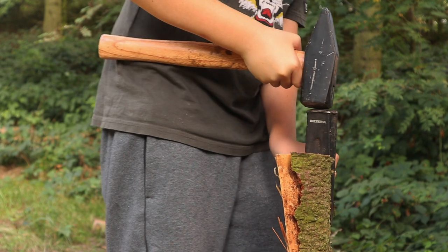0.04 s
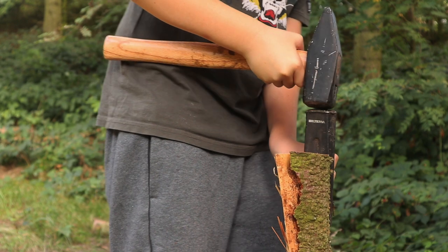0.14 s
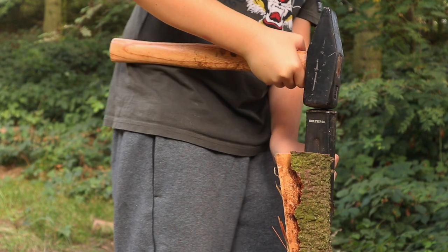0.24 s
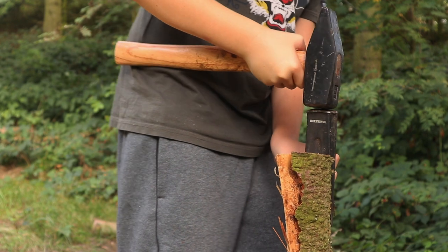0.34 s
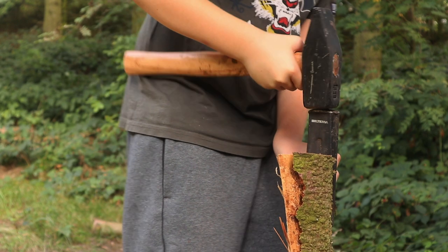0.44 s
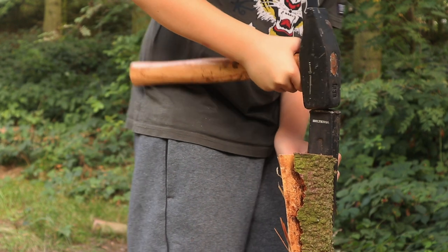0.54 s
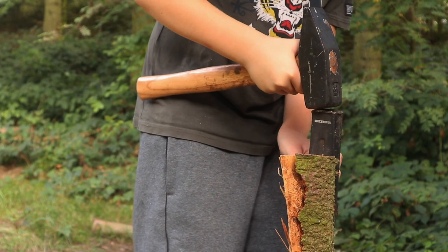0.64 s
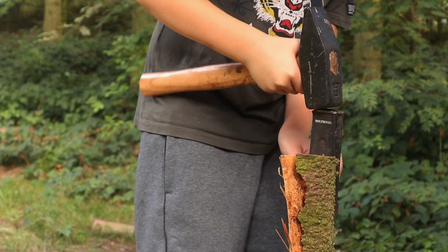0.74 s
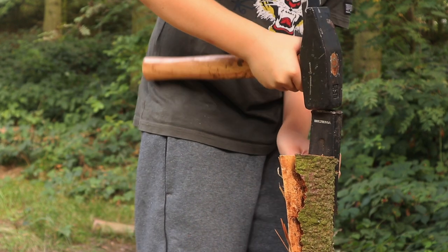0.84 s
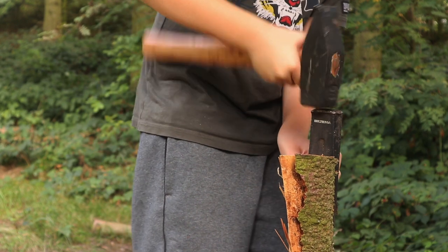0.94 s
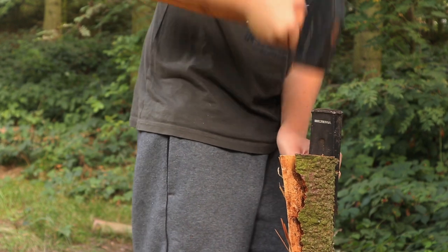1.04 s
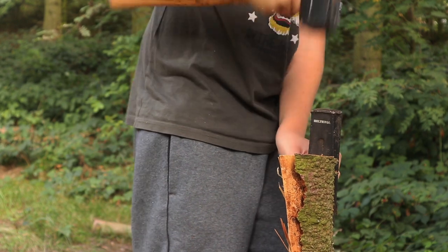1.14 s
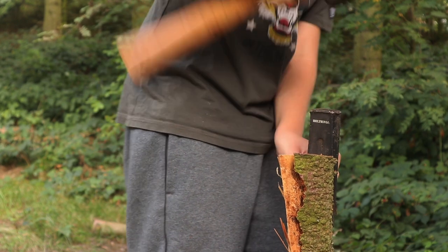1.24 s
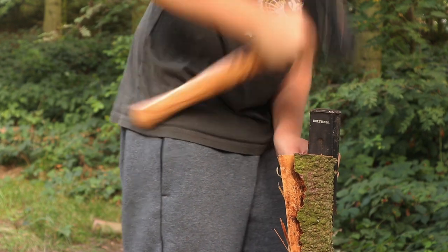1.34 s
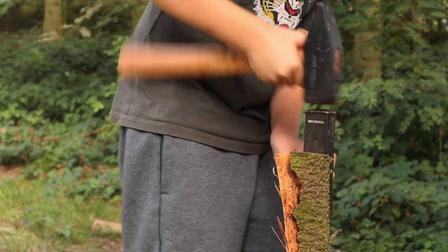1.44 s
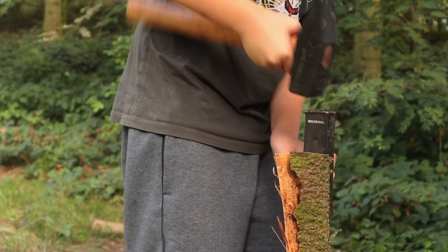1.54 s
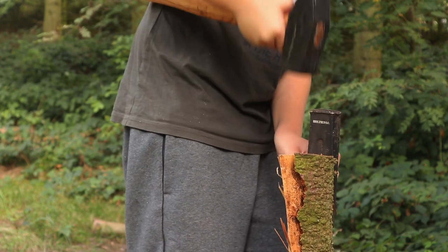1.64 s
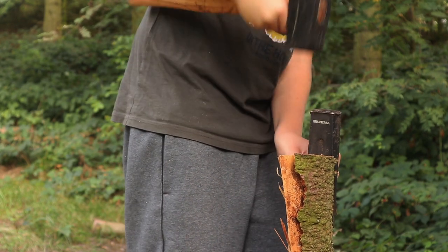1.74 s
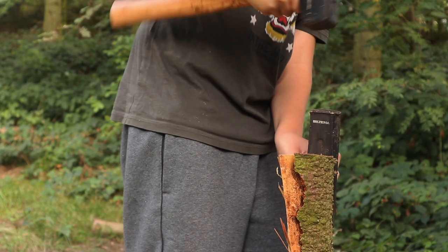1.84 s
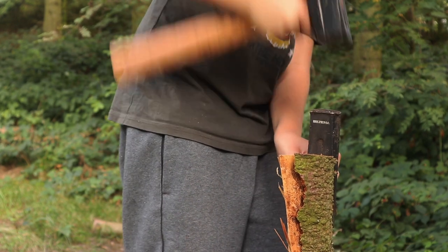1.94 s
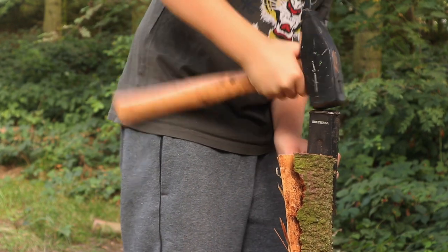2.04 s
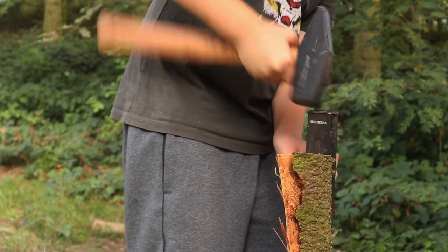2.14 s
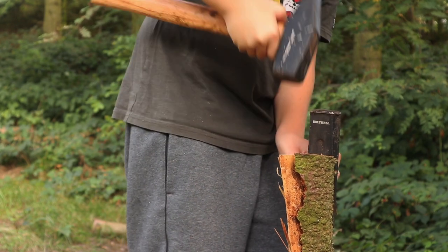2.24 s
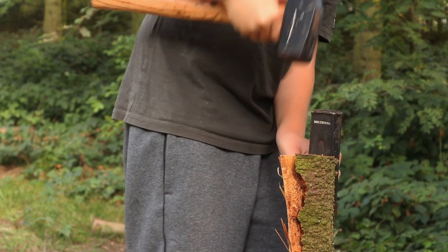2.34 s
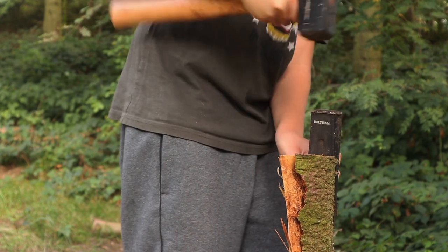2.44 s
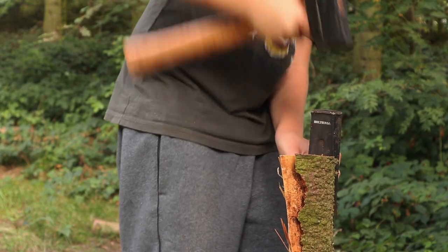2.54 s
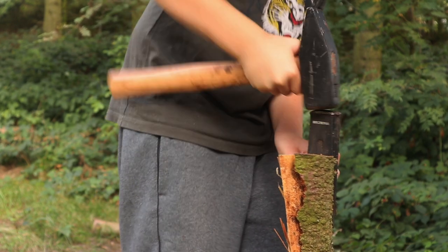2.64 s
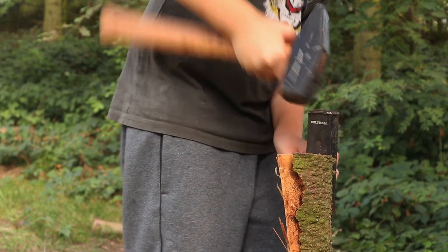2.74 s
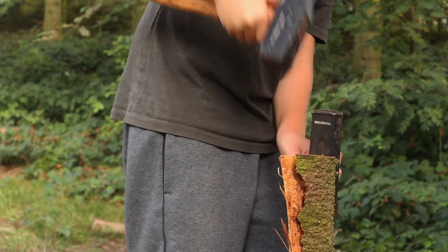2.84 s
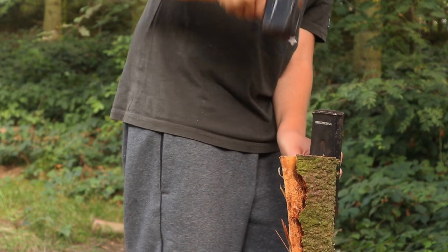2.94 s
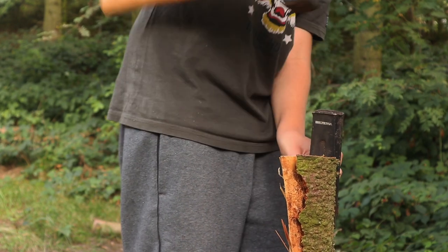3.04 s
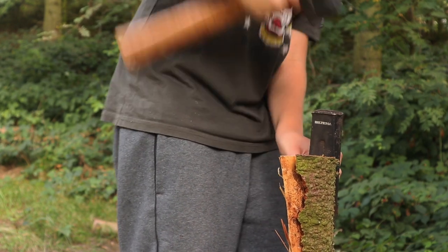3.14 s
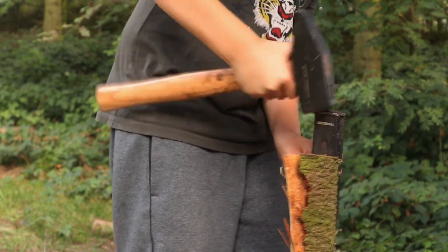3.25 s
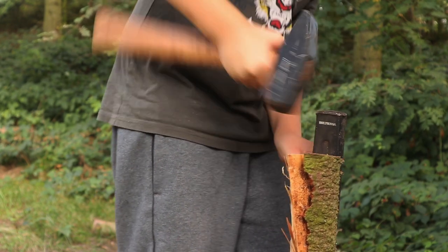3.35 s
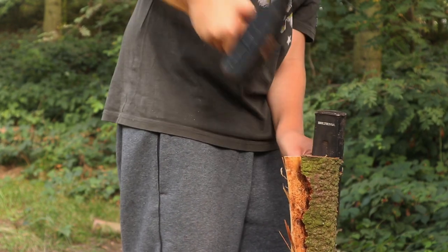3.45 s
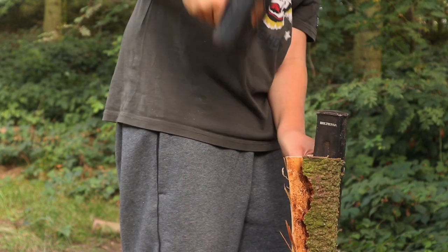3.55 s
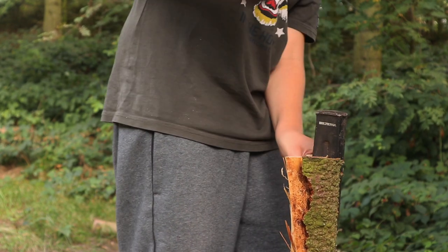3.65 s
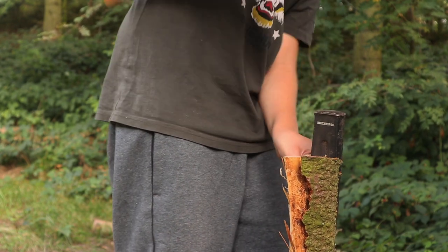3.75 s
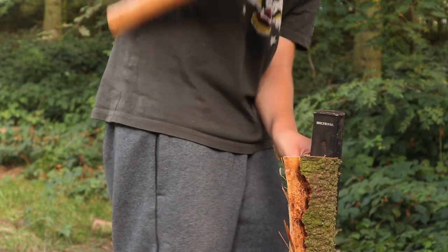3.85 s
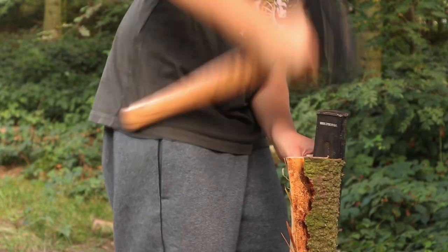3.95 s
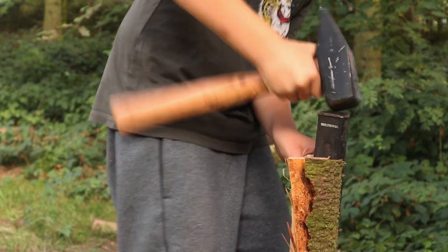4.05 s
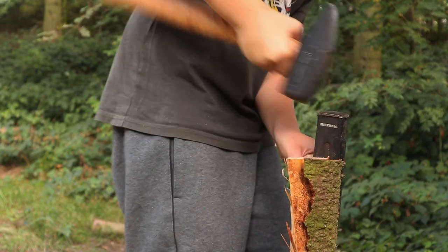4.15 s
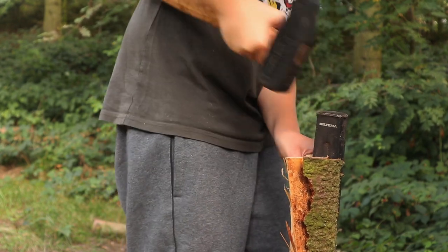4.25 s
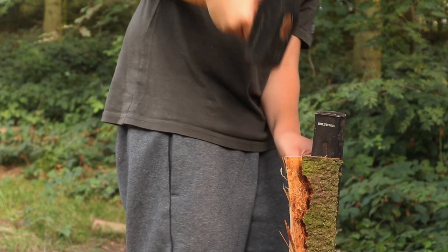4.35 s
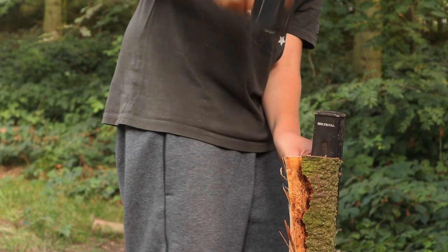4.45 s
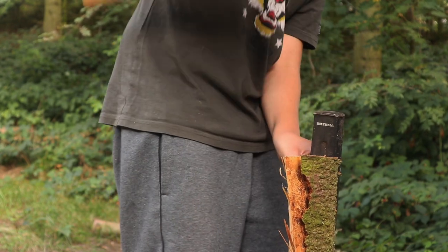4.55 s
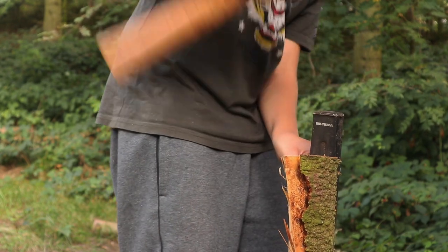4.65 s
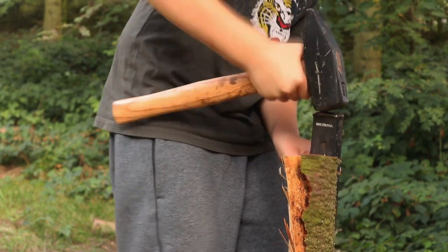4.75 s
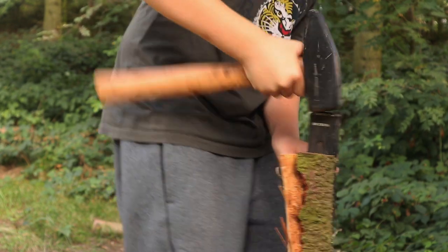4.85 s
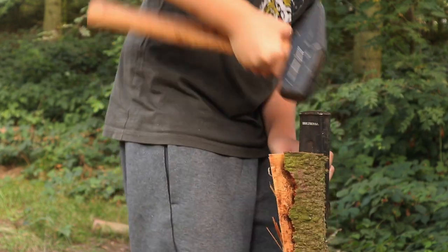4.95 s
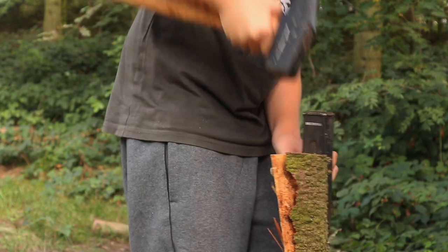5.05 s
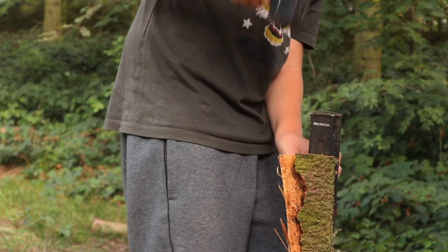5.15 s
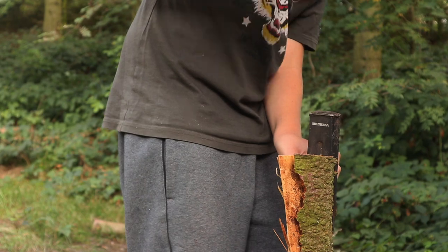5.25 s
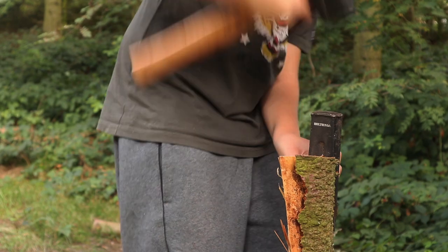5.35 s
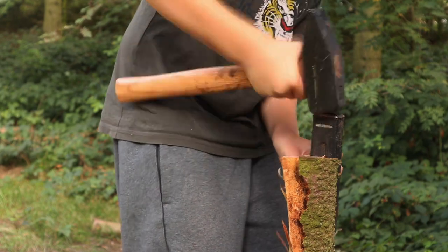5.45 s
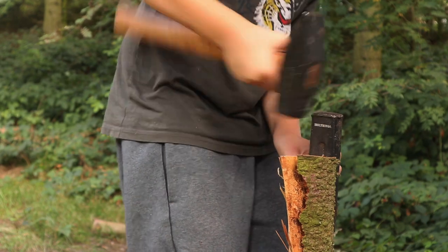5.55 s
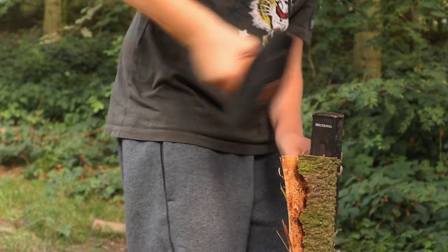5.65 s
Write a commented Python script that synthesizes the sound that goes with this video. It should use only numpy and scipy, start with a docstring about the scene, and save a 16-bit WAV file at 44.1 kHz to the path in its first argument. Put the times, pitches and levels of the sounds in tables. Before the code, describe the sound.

A hammer strikes a steel wedge in a log seven times, sharp metal blows echoing through a forest with faint birdsong.

```python
"""A hammer drives a steel wedge into an upright log: seven close blows in a forest clearing.
Log and steel ring briefly, the wood cracks, the soil shudders, and after two blows the hammer bounces.
The trees send each blow back. Sleeves rustle, and small birds whistle over soft air and a far, low drone.
The blows overload the microphone; its gain control turns down at each one and creeps back up."""
import sys
import numpy as np
from scipy import signal
from scipy.fft import rfft, irfft
from scipy.io import wavfile
from scipy.ndimage import uniform_filter1d

SR = 44100
rng = np.random.default_rng(int(sys.argv[2]) if len(sys.argv) > 2 else 0)


def store_pcm(level_fs):
    """Save levels as 16-bit WAV."""
    pcm = np.round(np.clip(level_fs, -1, 1) * 32767).astype(np.int16)
    wavfile.write(sys.argv[1], SR, np.atleast_2d(pcm).T)


N = 250915

# One row a blow: t/s, force/dB, log/dB, middle/dB, treble/dB, log's pitch factor, second contact/ms,
# outer steel tones/dB, inner steel tones/dB, after-ring/dB, soil/dB
BLOWS = [(1.3527, -0.5, .5, -6, 2, 0.97, 2.2, -34, -39, 3, 1),
         (1.9888, 1, -4.5, -3, -2.5, 1.023, 2.46, -43, -40.5, 13.5, -7),
         (2.5980, 2, -7.5, -4, 2.5, 0.92, 1.9, -43.5, -48, 3, -7),
         (3.2103, 0, -5.5, -5, 4.5, 1.05, 1.8, -40.5, -37, 3, 3.5),
         (3.9790, 0.5, -1, 0, -0.5, .99, 1.8, -46, -23, 8.5, 3),
         (4.7491, 1, -1.5, -0.5, -0.5, 1.025, 1.56, -56, -30, 1, 2.5),
         (5.4299, 4.5, -7, -2.5, 3.5, 0.98, 2.3, -31, -23, 1.5, 2.5)]
def hammer(trunk_s=0.039, trunk_db=-32, ring_echo_db=-20, echo_db=2.04):
    """The hammer hits and bounces close by, and the trees answer."""
    close, echoes = np.zeros((2, 2, N))
    for s, force_db, *stroke, _ in BLOWS:
        sound = blow(force_db, *stroke)
        add(close, s, sound)
        add(echoes, s + trunk_s, amp(trunk_db) * sound)  # one distinct trunk echo, just after the blow
        add(echoes, s, amp(force_db + echo_db) * crack_echo())
    close += bounces()
    return microphone_pair(close) + echoes + amp(ring_echo_db) * scatter(close.mean(0))


# Tones of the log (first four), then of hammer and wedge pressed together: f/Hz; level/dB
BODY_HZ = [165, 320, 590, 805, 1260, 1500, 1815, 2220, 2675, 3090, 3520, 3835, 4500, 5850, 6940, 9670]
BODY_DB = [-17.5, -19, -12, -8.5, -14, -9.5, -7, -4.5, -2, -10.5, -9, -5.5, -12, -13.5, -12.5, -18]
# How long they take to fade by 60 dB: f/Hz, fade/s
BODY_FADE = [(150, 0.045), (550, 0.031), (800, .046), (1250, 0.028), (1850, 0.022), (3000, 0.017),
             (10000, 0.009)]
# Log and hammer head sing on faintly once they part: f/Hz, level/dB, fade/s
AFTER_RING = [(550, -42.5, 0.052), (793.7, -34, 0.076), (1780, -34.5, 0.11), (2586, -41, 0.15),
              (3980, -45.5, 0.068)]
# Steel ringing freely: f/Hz, level/dB, fade/s
STEEL_TONES = [(8484, .5, .13), (9103, 1, .125), (12330, -14, .09), (15200, -21, .11)]
# How alike the crack is left and right: f/Hz, likeness (1 same, 0 unrelated, -1 opposite)
CRACK_LIKENESS = [(1000, 1), (3500, .9), (9000, .5)]
def blow(force_db, log_db, middle_db, treble_db, pitch, again_ms, outer_db, inner_db, after_db,
         again_gain=0.11, crack_db=-12, crack_fade_s=0.051, rise_s=.0003):
    """Steel meets steel twice within a few ms; the wedge jerks forward and the wood fibres crack."""
    t = np.arange(SR // 4) / SR
    balance = [(700, log_db), (1400, middle_db), (2700, middle_db), (3800, treble_db)]
    hz = np.array(BODY_HZ, float)
    hz[:4] *= pitch  # the log's pitch shifts as it splits
    tones = list(zip(hz, BODY_DB + read(balance, hz), read(BODY_FADE, hz)))
    body = (ring(tones, t) + again_gain * ring(tones, t - again_ms / 1000)).sum(0)
    body += amp(after_db) * ring(AFTER_RING, t).sum(0)
    spectrum = [(100, -14), (600, 0.5), (3000, 5.5), (6000, -7.5), (10000, -13.5), (16000, -24.5)]
    fibres = unit_level(colour(stereo_noise(len(t), CRACK_LIKENESS), spectrum))
    crack = fibres * amp(crack_db + treble_db - 60 * t / crack_fade_s)
    steel = amp([outer_db, inner_db, inner_db, outer_db]) @ ring(STEEL_TONES, t)  # set by the spot hit
    return amp(force_db) * (body + crack + steel) * (1 - np.exp(-t / rise_s))


# The hammer's bounces: t/s, level/dB
BOUNCES = [(3.2192, -10), (3.2440, -12.5), (5.4400, -2.5), (5.465, -11), (5.5085, -12)]
# The log's dull knock and the lightly tapped wedge: f/Hz, level/dB, fade/s
LOG_KNOCK = [(150.2, -28, .07), (252, -23.5, 0.054)]
WEDGE_TONES = [(780, -19.5, .03), (1350, -7, .015), (1927, 3, 0.025), (2665, -5, 0.022), (3970, -23, 0.027)]
def bounces(rise_s=0.00035):
    """The hammer falls back on the wedge and taps it."""
    out, t = np.zeros(N), np.arange(SR // 10) / SR
    tap = ring(LOG_KNOCK + WEDGE_TONES, t).sum(0) * (1 - np.exp(-t / rise_s))
    for s, db in BOUNCES:
        add(out, s, amp(db) * tap)
    return out


# The shudder in the soil: f/Hz, level/dB
SOIL_SPECTRUM = [(20, -11.5), (70, -5), (125, 0.5), (210, -3.5), (320, -8.5), (500, -24.5), (1000, -71.5)]
def ground(rise_s=.012, fade_s=0.2, shudder_db=-35, sway_hz=45, sway_db=-42, sway_s=0.035):
    """The log passes each blow into the soil, which shudders at once and sways a little later."""
    out, t = np.zeros(N), np.arange(SR // 2) / SR
    sway = amp(sway_db) * np.sin(2 * np.pi * sway_hz * t) * (t / sway_s * np.exp(1 - t / sway_s)) ** 2
    envelope = (1 - np.exp(-t / rise_s)) * amp(shudder_db - 60 * t / fade_s)
    for s, force_db, *_, soil_db in BLOWS:
        shudder = unit_level(colour(rng.standard_normal(len(t)), SOIL_SPECTRUM)) * envelope
        add(out, s, amp(force_db + soil_db) * (shudder + sway))
    return out


# A blow as the trees send it back: f/Hz, level/dB
ECHO_SPECTRUM = [(100, -1.5), (330, -6), (560, 1.5), (800, 3.5), (1100, -4.5), (1500, 1), (1900, 3.5),
                 (2550, 1), (3200, -2.5), (3850, -2), (5200, -7), (9300, -10), (11000, -25.5),
                 (16000, -38.5)]
def crack_echo():
    """The crack comes back from all around."""
    return colour(forest(), ECHO_SPECTRUM)


# How long echoes last: f/Hz, fade/s
ECHO_FADE = [(100, 0.18), (500, 0.28), (2000, 0.42), (4000, 0.41), (8000, .4), (14000, 0.65)]
# How alike they are left and right: f/Hz, likeness
ECHO_LIKENESS = [(200, 1), (800, .96), (2000, .84), (3200, .5), (5000, 0), (9000, -.3)]
def forest(build_s=0.006, near_db=2, near_s=0.028, uneven=.18):
    """Echoes of one click from trunks and leaves; the nearest are the strongest."""
    echoes = stereo_noise(SR) * (1 + uneven * wobble(SR, 200))
    hz, t, bands = signal.stft(echoes, SR, nperseg=256)
    bands = bands * amp(-60 * t / read(ECHO_FADE, hz)[:, None])
    tail = signal.istft(bands, SR, nperseg=256)[1][:, :SR]
    t = np.arange(SR) / SR
    return tail / np.linalg.norm(tail[0]) * (1 - np.exp(-t / build_s)) * amp(near_db * np.exp(-t / near_s))


def scatter(x):
    """What the forest sends back of a sound."""
    return signal.fftconvolve(x[None], forest(), axes=1)[:, :N]


# How far the left side is ahead: f/Hz, phase/rad
LEFT_LEAD = [(100, 0), (2500, -0.34), (4000, 0.39), (5500, -1.2), (8000, -1.4), (11000, -1.1),
             (16000, -0.68)]
def microphone_pair(x, right_db=1.63):
    """A near sound reaches the two microphone openings slightly out of step."""
    shift = np.exp(.5j * read(LEFT_LEAD, frequencies(x)))
    return irfft(rfft(x) * np.array([shift, amp(right_db) / shift]), N)


def swings(swing_s=0.2, swing_db=-66):
    """The sleeve rustles ever louder as the arm comes down for each blow."""
    out, speed = np.zeros((2, N)), np.linspace(0, 1, round(swing_s * SR))
    spectrum = [(150, 4), (1000, -8), (4000, -11), (12000, -30)]
    for s, *_ in BLOWS:
        rustle = unit_level(colour(stereo_noise(SR // 2), spectrum))
        add(out, s - swing_s, amp(swing_db) * speed * rustle[:, :len(speed)])
    return out


# Faint swells of noise: t/s, length/s, strongest f/Hz, level/dB
RUSTLES = [(0.634, 0.0087, 5000, -62), (1.45, 0.61, 2241, -67.5), (2.271, 0.04, 905, -58.5)]
def rustles():
    """Two brief soft brushes and a longer, faint, distant rustle."""
    out = np.zeros((2, N))
    for s, length, hz, db in RUSTLES:
        noise = unit_level(colour(stereo_noise(SR), [(hz / 8, -6), (hz, 0), (hz * 2, -9), (hz * 4, -26)]))
        swell = np.hanning(round(length * SR))
        add(out, s, amp(db) * noise[:, :len(swell)] * swell)
    return out


# Raspy calls: t/s, level/dB
RASPY_CALLS = [(4.721, -54), (4.922, -47.5), (5.256, -48.5)]
# Note shapes: start f/Hz, turn f/Hz, end f/Hz, place of the turn (0-1), rasp (share of the pitch)
RISE = (4650, 5850, 7900, .45, .06)
FALL = (4750, 3600, 2950, .48, .045)
def raspy_bird(rise_s=0.033, rise_db=-12, fall_after_s=0.02, fall_s=.066, echo_db=-1.5):
    """Each call is a raspy rise, then a louder fall."""
    out = np.zeros(N)
    for s, db in RASPY_CALLS:
        add(out, s, whistle(rise_s, db + rise_db, *RISE, octave_db=-19.5))
        add(out, s + fall_after_s, whistle(fall_s, db, *FALL))
    return out + amp(echo_db) * scatter(out)


# The song's opening slides: t/s, level/dB
SLIDES = [(2.16, -54.5), (2.243, -53.5)]
# Note shapes, with the same columns as RISE
SLIDE = (4300, 3700, 2950, .4, .01)
TWEET = (6200, 6150, 5400, .45, .018)
FLICK = (8600, 6500, 4600, .5, .018)
ARCH = (3150, 4150, 2100, .58, .008)
def near_bird(slide_s=.038, tweet_s=.028, flick_s=.014, arch_s=.044, step_db=-2.16, echo_db=-8):
    """One song: two downward slides, a high two-voiced twitter, then slower up-and-down notes."""
    out = np.zeros(N)
    for s, db in SLIDES:
        add(out, s, whistle(slide_s, db, *SLIDE))
    for k in range(5):  # both runs get softer note by note
        twitter_at, twitter_db = 2.351 + k * .048, -59 + k * step_db
        arch_at, arch_db = 2.853 + k * .081, -58 + k * step_db
        add(out, twitter_at, whistle(tweet_s, twitter_db, *TWEET))
        add(out, twitter_at + .013, whistle(flick_s, twitter_db - 6, *FLICK))  # the second voice
        add(out, arch_at, whistle(arch_s, arch_db, *ARCH))
    return out + amp(echo_db) * scatter(out)


# Single notes deep in the trees: t/s, length/s, level/dB, start f/Hz, turn f/Hz, end f/Hz
FAR_NOTES = [(1.24, 0.049, -74, 2980, 2710, 2400), (4.441, 0.039, -70, 3910, 4310, 4400),
             (4.612, 0.027, -69.5, 4900, 5920, 6350), (4.64, 0.053, -67.5, 4270, 4330, 5150)]
# The notes of one phrase: same columns, time and level relative to the phrase
PHRASE_NOTES = [(-.04, .05, -20, 6900, 6750, 6300), (.002, .06, -.5, 4900, 5750, 5520),
                (-.002, .068, -1, 4100, 5300, 4000), (.07, .066, -.5, 4000, 5450, 4350),
                (.085, .05, -10, 3100, 4050, 5100), (.135, .045, -14, 7700, 8500, 8300),
                (.148, .035, -6, 3150, 3480, 4200)]
# Each time it is sung: t/s, level/dB
PHRASES = [(.326, -55.5), (.819, -60.5)]
def far_bird(echo_db=3.5):
    """The same phrase twice and a few single notes, blurred by strong echoes."""
    out = np.zeros(N)
    for s, *note in FAR_NOTES:
        add(out, s, whistle(*note))
    for s, db in PHRASES:
        for after, length, share_db, *glide in PHRASE_NOTES:
            add(out, s + after, whistle(length, db + share_db, *glide))
    return out + amp(echo_db) * scatter(out)


def whistle(length, db, start_hz, turn_hz, end_hz, turn=0.36, rasp=0.016, octave_db=-26):
    """One bird note: a whistle that glides through a turning point, with a faint octave above."""
    progress = np.linspace(0, 1, round(length * SR))
    size = len(progress)
    turn_hz *= 1 + .03 * rng.uniform(-1.1, 1)  # no two notes are quite alike
    glide = np.interp(progress, [0, turn, 1], [start_hz, turn_hz, end_hz])
    hz = uniform_filter1d(glide, size // 4) * (1 + rasp * wobble(SR // 4, 60)[:size])
    phase = 2 * np.pi * np.cumsum(hz) / SR
    tone = np.sin(phase) + amp(octave_db) * np.sin(2 * phase)
    return amp(db) * tone * signal.windows.tukey(size, .5)


# Air in the leaves: f/Hz, level/dB
AIR_SPECTRUM = [(20, -9), (90, -5.5), (170, -12.5), (400, -10.5), (650, -14), (900, -17), (1600, -21),
                (2100, -19.5), (3000, -23), (4300, -22), (6000, -30.5), (9000, -33), (12000, -42),
                (16000, -50)]
# How alike it is left and right: f/Hz, likeness
AIR_LIKENESS = [(100, .97), (250, .4), (500, .2), (1000, -.3), (2000, .2), (3500, -.1), (10000, -.2)]
def air(level_db=-63.5, patchy_db=2.0):
    """Air stirs the leaves: a soft hiss, uneven in time and pitch."""
    bands = signal.stft(colour(stereo_noise(N, AIR_LIKENESS), AIR_SPECTRUM), nperseg=512)[2]
    patches = uniform_filter1d(rng.standard_normal(bands.shape[1:]), 10, axis=0)
    patches = unit_level(uniform_filter1d(patches, 16, axis=1))
    hiss = signal.istft(bands * amp(patchy_db * patches), nperseg=512)[1][:, :N]
    return amp(level_db) * unit_level(hiss)


# The drone's two notes: f/Hz, level/dB
DRONE_TONES = [(71, -2), (102, -3.5)]
def drone(level_db=-67, waver_hz=1.2):
    """A far, low hum whose pitch wavers slowly."""
    t, knots = np.arange(N) / SR, np.linspace(0, N / SR, num=30)
    drift = np.cumsum(waver_hz * np.interp(t, knots, rng.standard_normal(len(knots)))) / SR
    hum = sum(amp(db) * np.sin(2 * np.pi * (hz * t + drift + rng.random())) for hz, db in DRONE_TONES)
    return amp(level_db) * np.sqrt(2) * hum


def ring(tones, t):
    """Fading tones struck at t = 0, one row each; neighbours swing opposite ways."""
    t = np.maximum(t, 0)
    return np.array([(-1) ** k * amp(db - 60 * t / fade_s) * np.sin(2 * np.pi * hz * t)
                     for k, (hz, db, fade_s) in enumerate(tones)])


def stereo_noise(size, likeness=ECHO_LIKENESS):
    """Noise from many directions, as two close microphone openings hear it."""
    noise = rng.standard_normal((2, size))
    left, other = rfft(noise)
    same = read(likeness, frequencies(noise))
    return irfft(np.array([left, same * left + np.sqrt(1 - same ** 2) * other]), size)


def wobble(size, smooth):
    """Smoothed random ups and downs."""
    return unit_level(uniform_filter1d(rng.standard_normal(size), smooth))


def colour(x, points):
    """Filters x by a curve of (f/Hz, level/dB) points."""
    return irfft(rfft(x) * amp(read(points, frequencies(x))), x.shape[-1])


def read(points, hz):
    """Reads between a table's rows on a log-frequency axis."""
    f, value = np.transpose(points)
    return np.interp(np.log(hz + 1), np.log(f + 1), value)


def frequencies(x):
    """Frequencies of the spectrum of x."""
    return np.fft.rfftfreq(x.shape[-1], 1 / SR)


def amp(db):
    """Decibels to gain."""
    return 10 ** (np.asarray(db) / 20)


def unit_level(x):
    """Scales to an average (rms) level of 1."""
    return x / np.sqrt(np.mean(x ** 2) + 1e-20)


def add(mix, s, sound):
    """Adds a sound to the mix at time s."""
    part = mix[..., max(round(s * SR), 0):][..., :sound.shape[-1]]
    part += sound[..., :part.shape[-1]]


def scene():
    """Blows close by, the forest around them."""
    work = hammer() + ground() + swings()
    return work + rustles() + far_bird() + raspy_bird() + near_bird() + drone() + air()


def gain_control(x, start_db=6, threshold_db=-20.5, cut_s=0.027, recover_db_per_s=7.5, block=44):
    """The gain drops faster the further the output is over the threshold, then creeps back up."""
    starts = np.arange(0, N, block)
    peaks_db = 20 * np.log10(np.maximum.reduceat(abs(x).max(0), starts) + 1e-9)
    gain_db, gains_db = start_db, []
    for peak_db in peaks_db:
        gains_db.append(gain_db)
        excess_db = max(min(peak_db + gain_db, 0) - threshold_db, 0)
        gain_db += (recover_db_per_s - excess_db / cut_s) * block / SR
    return amp(np.interp(np.arange(N), starts, gains_db))


def record(dry, top_hz=16000):
    """The gain control is too slow to stop the blows overloading; the highest treble is then cut."""
    driven = dry * gain_control(dry)
    clipped = driven / (1 + driven ** 8) ** (1 / 8)
    lowpass = signal.firwin(255, top_hz, window=("kaiser", 8), fs=SR)
    return signal.oaconvolve(clipped, lowpass[None], "same", axes=1)


dry = scene()
out = record(dry)
store_pcm(out)
```